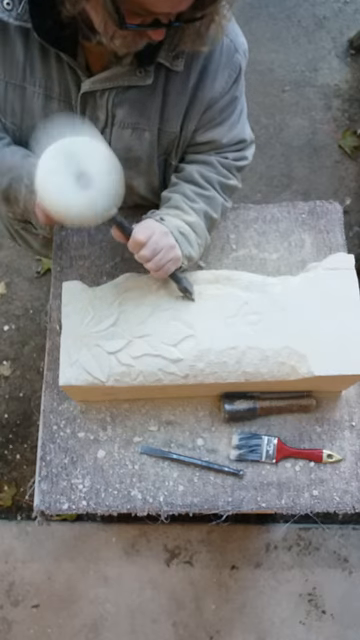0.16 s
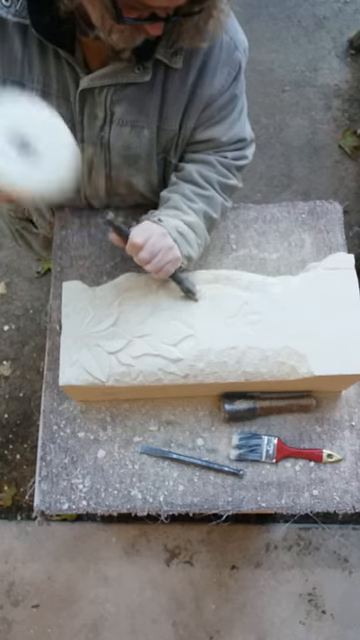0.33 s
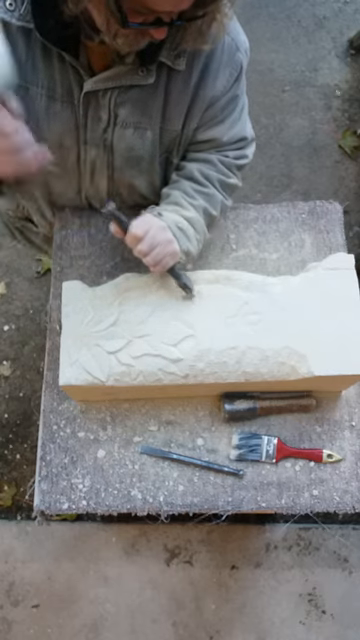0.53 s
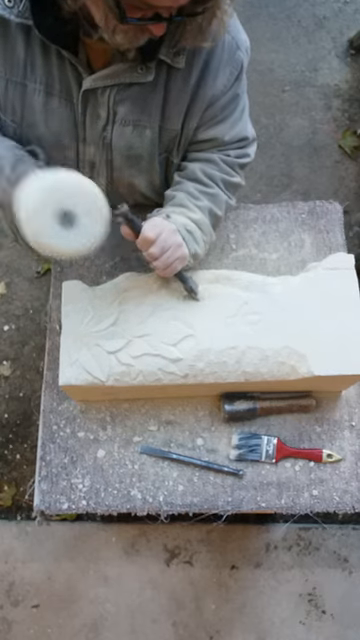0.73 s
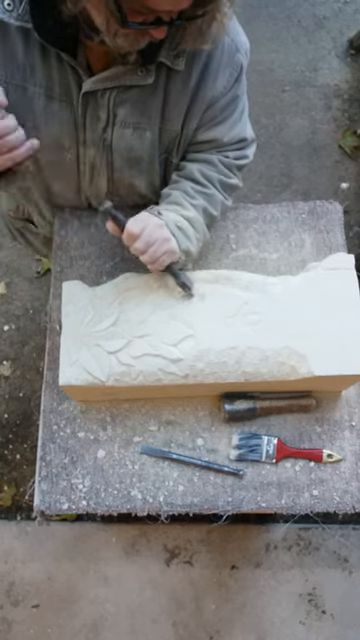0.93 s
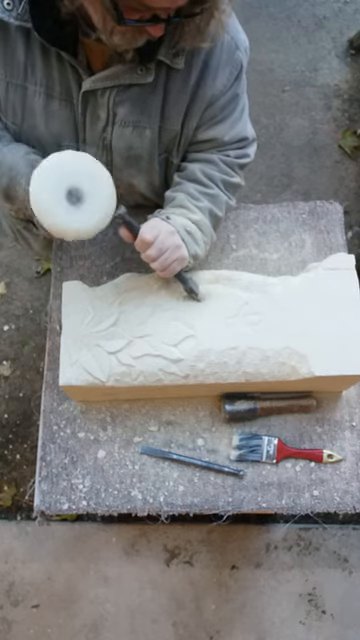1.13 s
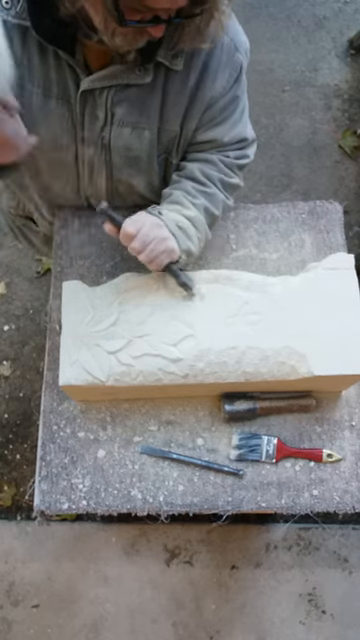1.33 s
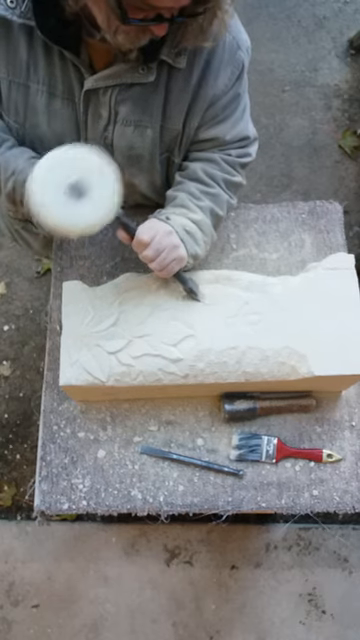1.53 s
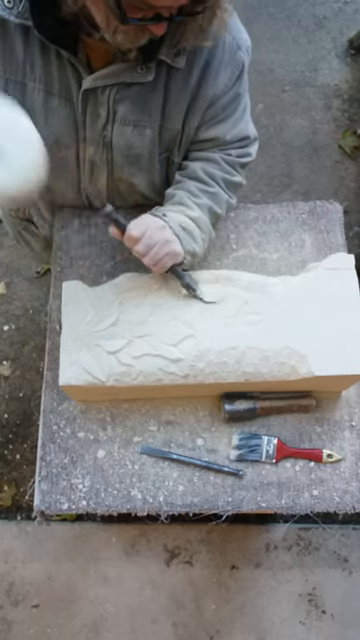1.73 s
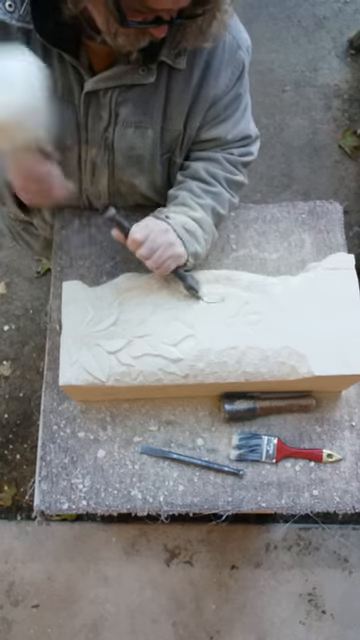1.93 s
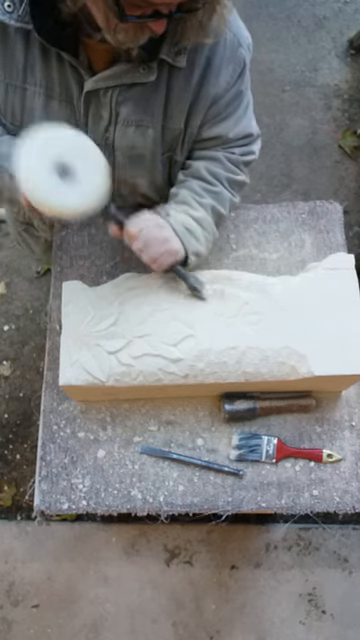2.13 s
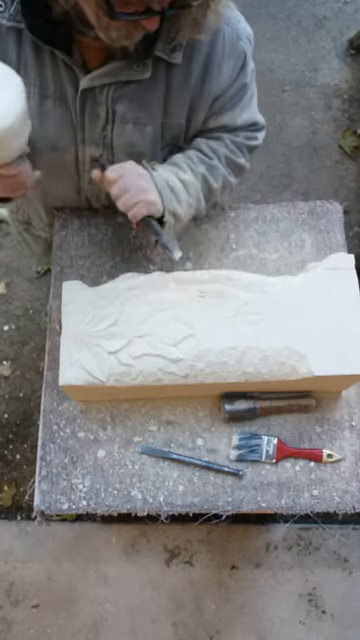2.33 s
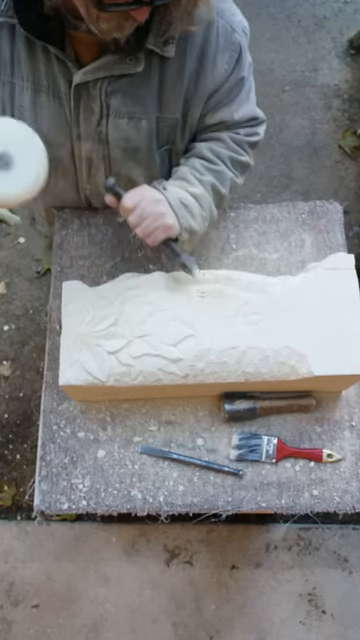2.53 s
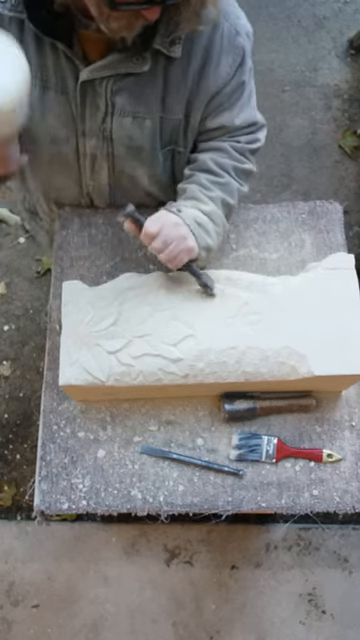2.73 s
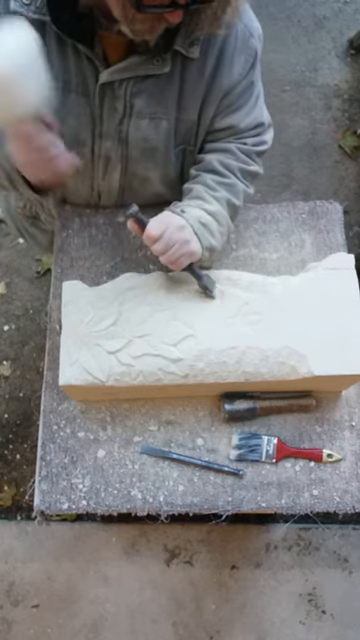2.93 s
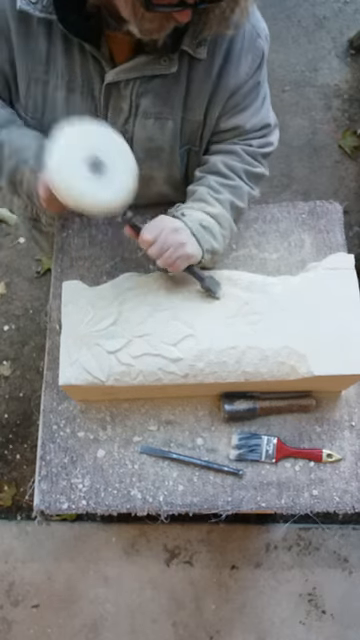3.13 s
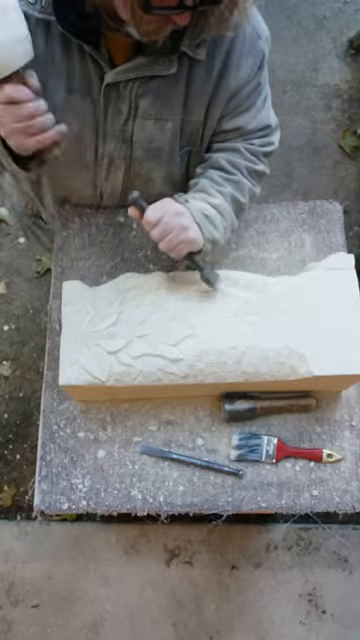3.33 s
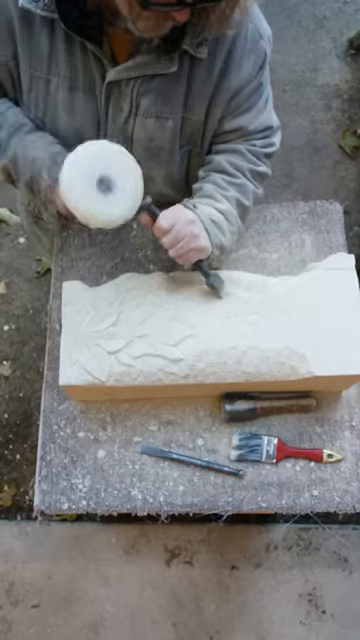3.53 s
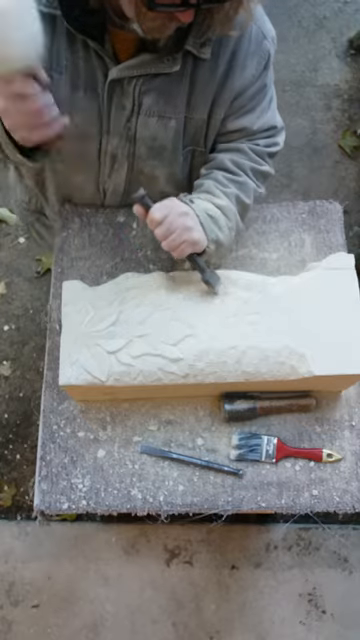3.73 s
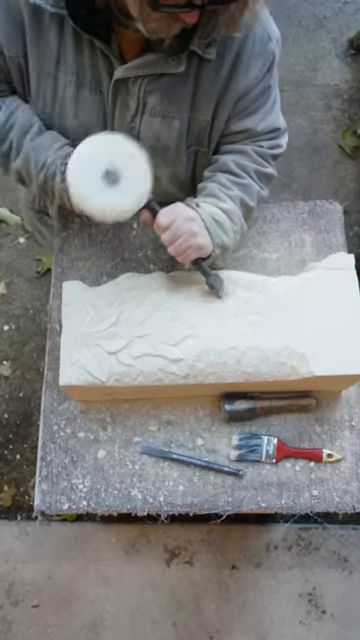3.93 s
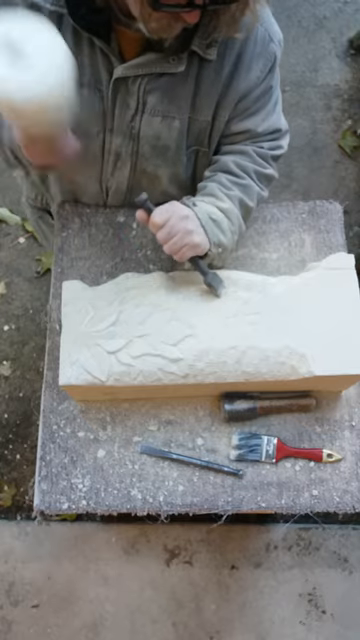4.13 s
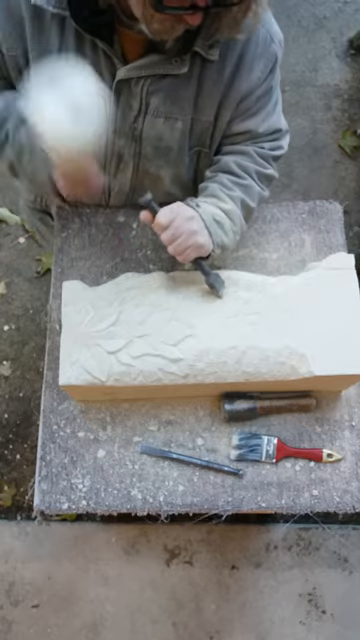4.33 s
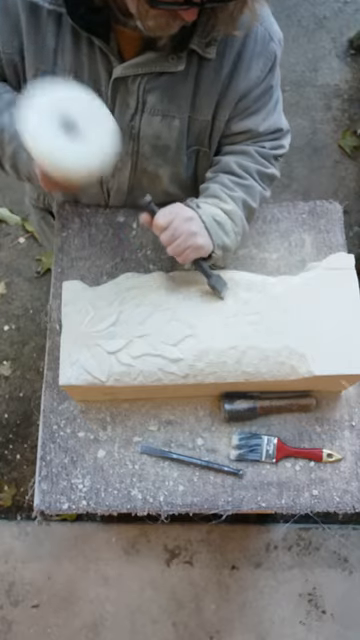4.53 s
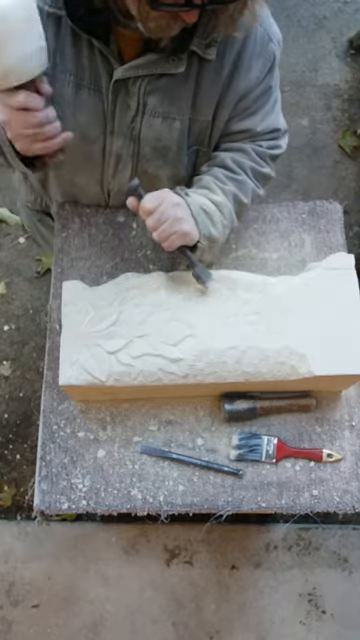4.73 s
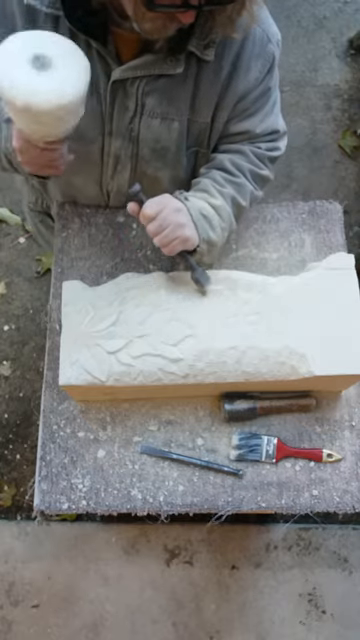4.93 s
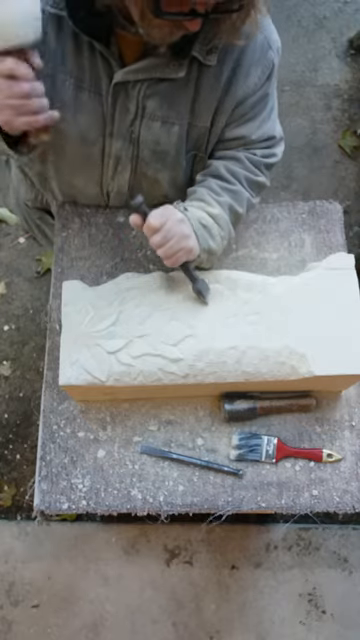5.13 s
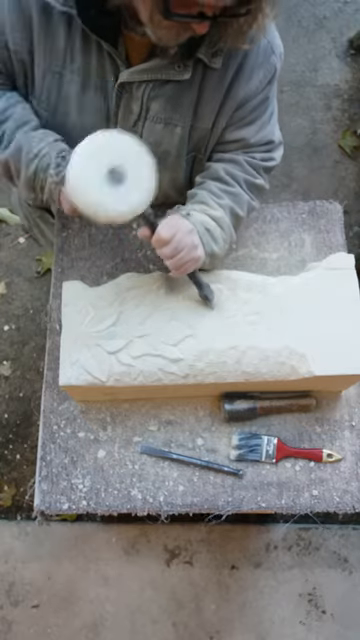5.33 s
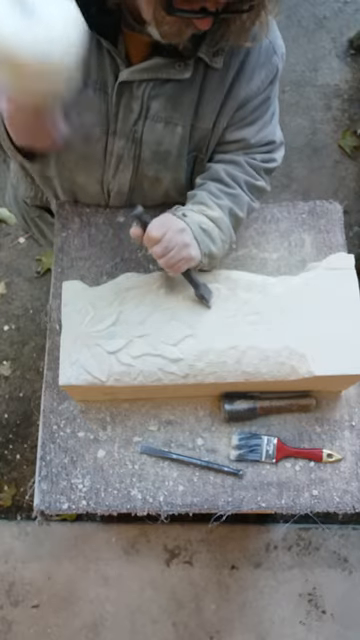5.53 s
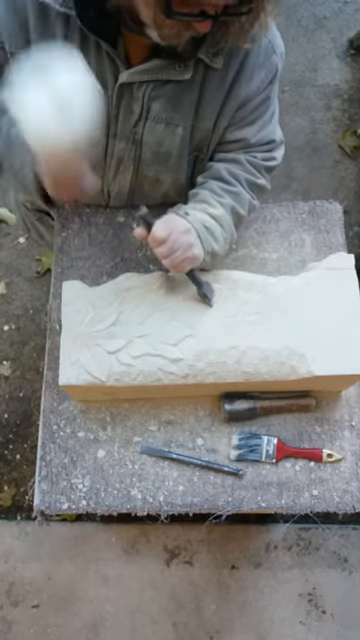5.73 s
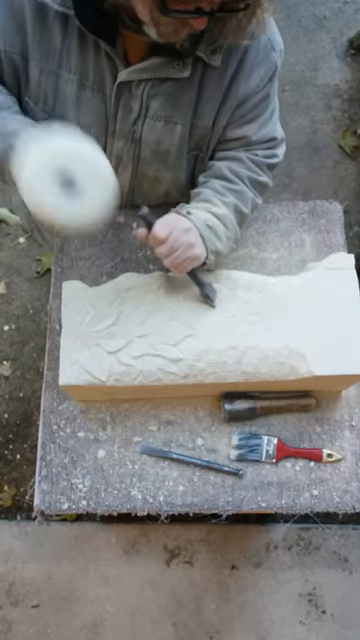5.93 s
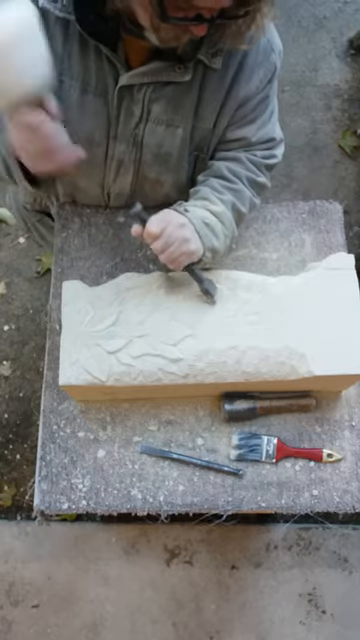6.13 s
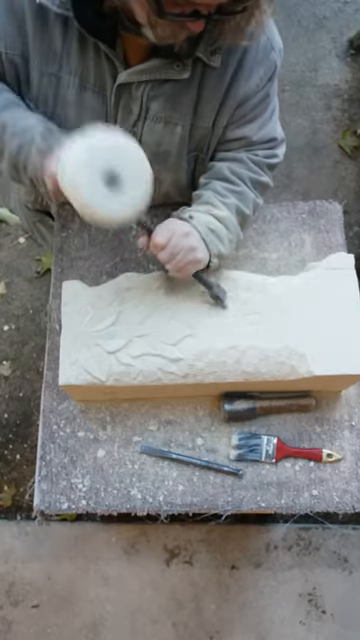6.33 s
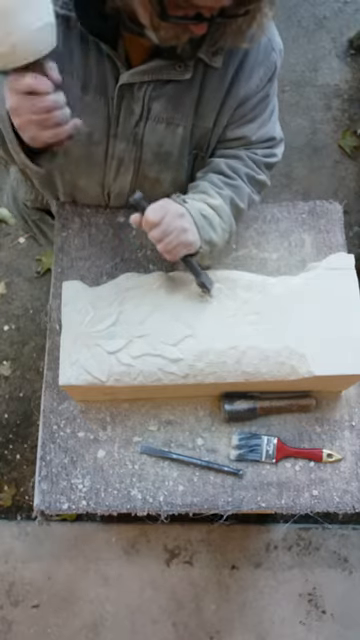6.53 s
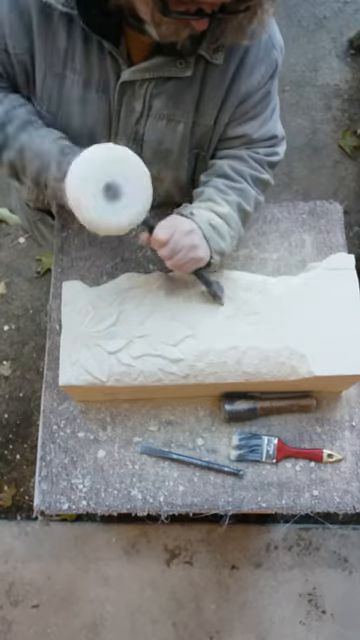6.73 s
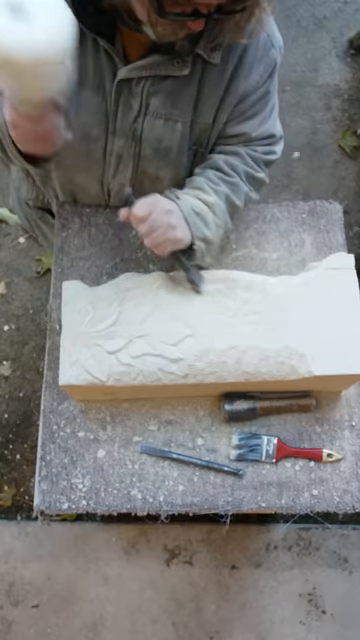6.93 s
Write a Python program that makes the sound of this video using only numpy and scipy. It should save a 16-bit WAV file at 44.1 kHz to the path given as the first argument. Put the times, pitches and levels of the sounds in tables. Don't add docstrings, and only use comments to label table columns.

```python
import sys
import numpy as np
from scipy import signal
from scipy.fft import rfft, irfft, next_fast_len
from scipy.io import wavfile
from scipy.ndimage import uniform_filter1d, minimum_filter1d, map_coordinates

SR = 44100
rng = np.random.default_rng(int(sys.argv[2]) if len(sys.argv) > 2 else 0)


def decibels_to_gain(level_db):
    exponent = np.asarray(level_db, float) / 20
    return 10 ** exponent


def int16_out(signal):
    q = np.round(np.clip(np.atleast_2d(signal).T, -1, 1) * 32767)
    wavfile.write(sys.argv[1], SR, q.astype(np.int16))


N = 307377
TAIL = 2 ** 15


def along(points, hz):
    f, value = np.transpose(points)
    return np.interp(np.log(hz + 1), np.log(f + 1), value)


def wobble(rate, size):
    knots = rng.standard_normal(int(size * rate / SR) + 4)
    return map_coordinates(knots, [np.arange(size) * rate / SR])


def add(out, s, sound):
    at = round(s * SR)
    sound = sound[max(-at, 0):][:N - max(at, 0)]
    out[max(at, 0):][:len(sound)] += sound


def coloured(spectrum, size, tilt_db=0):
    hz = np.fft.rfftfreq(size, 1 / SR)
    z = rfft(rng.standard_normal(size)) * decibels_to_gain(along(spectrum, hz))
    tilt = decibels_to_gain(tilt_db * np.log2((hz + 50) / 4000))
    return irfft(z * tilt, size) / np.std(irfft(z, size))


def resonance(f, centre, width):
    return 1j * f * width / (centre * centre - f * f + 1j * f * width)


def struck(modes, contact_s, low_db):
    size = 2 ** 12
    f = np.fft.rfftfreq(size, 1 / SR)
    push = np.sin(np.pi * np.clip(np.arange(size) / (contact_s * SR), 0, 1))
    body = 0
    for k, (centre, width, db) in enumerate(modes):
        sign_and_lift = -decibels_to_gain(low_db) if k == 0 else 1
        body = body + sign_and_lift * decibels_to_gain(db) * resonance(f, centre, width)
    knock = irfft(rfft(push) * body, size)
    return knock / np.abs(knock).max()


STRIKE_TIMES = [-.17, .2848, .7357, 1.1821, 1.6404, 2.1108, 3.1284, 3.5846, 4.0279, 4.4773, 5.4277, 5.8821,
                6.3324, 6.7845]
# columns strength [level/dB], slab thump [level/dB], bite into the stone [level/dB]
BLOW_FORCES = [(-9, -1, 2), (-11.5, -0.5, 5), (-10.5, 4.5, 1), (-9.5, 3, -0.5), (-12, 1.5, 1.5),
               (-14, -2.5, 10), (-8, 4.5, 7.5), (-7, 3, 7), (-11, 4.5, 5.5), (-9, 0, 10),
               (-10.5, -5.5, 3.5), (-6.5, -0.5, 6.5), (-10.5, -3, 8.5), (-14, -8, 8)]
GRIP_FREE_HZ = [1560, 1570, 1730, 1910, 1920, 4300, 4260, 1380, 3030, 3250, 4050, 1910, 4070, 4060]


def mallet():
    out = np.zeros(N)
    usual_db, yard_follows = -7, 0.9
    for s, free_hz, (db, thump_db, bite_db) in zip(STRIKE_TIMES, GRIP_FREE_HZ, BLOW_FORCES):
        yard_db = -17.5 + yard_follows * (db - usual_db)
        add_knock(out, s, db, thump_db)
        add(out, s, decibels_to_gain(db + bite_db - 9.5) * stone_crack())
        add_ringing(out, s, yard_db, free_hz, thump_db, bite_db)
        dull_db = -1.26 + 0.13 * bite_db
        add(out, s, decibels_to_gain(yard_db) * yard(dull_db))
    return out


# columns f/Hz, width [f/Hz], level/dB
KNOCK_MODES = [(240, 55, 2), (366, 55, 5), (695, 80, -1), (1384, 60, 6), (1904, 60, 6), (3450, 300, -30)]
# columns lag [t/s], level/dB
BOUNCE_PATHS = [
    (0, -.7),
    (.0012, 0),
    (.0024, -1.7),
    (.0036, -16),
]


def add_knock(out, s, db, thump_db):
    t = np.arange(2 ** 12) / SR
    knock = struck(KNOCK_MODES, .00059, thump_db) / (1 + (t / .008) ** 3)
    for lag, bounce_db in BOUNCE_PATHS:
        add(out, s + lag, decibels_to_gain(db + bounce_db + 13) * knock)


# columns f/Hz, level/dB per Hz
CRACK_SPECTRUM = [(1590, -6), (2700, -6.5), (3050, -4.5), (3770, -7.5), (4870, -11), (6070, -38),
                  (7680, -15), (9000, -24.5), (11700, -22.5), (16500, -40)]


def stone_crack():
    t = np.arange(2 ** 12) / SR
    return coloured(CRACK_SPECTRUM, len(t)) * (1 - np.exp(-t / 0.0015)) * decibels_to_gain(-60 * t / 0.05)


MODE_HZ = [140, 1470, 1818, 3188, 4240, 4835, 195, 2980, 5600, 7800, 11400, 3563]
MODE_BLUR_HZ = [60, 35, 28, 40, 200, 340, 60, 300, 600, 1000, 500, 60]
# columns level/dB, t60 [t/s], clean share [ratio], first ping [level/dB]
MODE_RINGS = [(-31, 0.65, 0.068, -17), (-30.5, 0.44, 0.21, -18), (-36.5, 0.54, 1.5, 10),
              (-36.5, 0.33, 1.84, -11), (-35.5, 0.37, 0.56, 12), (-36.5, 0.4, 0.2, -6), (-31, 0.4, .1, -12),
              (-36.5, 0.18, 0.045, 21.5), (-47, 0.21, .05, 5), (-56, 0.29, .05, -12), (-51.5, 0.17, .05, 9),
              (-40.5, 0.17, 1.2, -1)]
MODE_GRIPPED_DB = [-4, -5.5, -5, -14.5, -16.5, -6.5, 1.5, -11, 0, 0., -1, -4.5]


def add_ringing(out, s, yard_db, free_hz, thump_db, bite_db):
    free_db, free_octaves = 23, .06
    for hz, blur_hz, mode, gripped_db in zip(MODE_HZ, MODE_BLUR_HZ, MODE_RINGS, MODE_GRIPPED_DB):
        freed_db = free_db / (1 + (np.log2(hz / free_hz) / free_octaves) ** 2)
        driven_db = 0
        if hz < 300:
            driven_db = thump_db
        elif hz > 5000:
            driven_db = bite_db
        add(out, s, decibels_to_gain(yard_db + gripped_db + freed_db + driven_db + 23) * ring(hz, blur_hz, *mode))


def ring(hz, blur_hz, db, t60, clean, ping_db):
    t = np.arange(TAIL // 2 + TAIL // 4) / SR
    knots = [1, 1j] @ rng.standard_normal(size=(2, 800))
    smear = clean + np.interp(t * blur_hz, np.arange(len(knots)), knots)
    tail = smear * decibels_to_gain(-60 * t / t60) * (1 - np.exp(-t / 0.0023))
    ping = decibels_to_gain(ping_db - 60 * t / .022) * (1 - np.exp(-t / .001))
    return decibels_to_gain(db) * np.imag((ping + tail) * np.exp(2j * np.pi * hz * t))


# columns f/Hz, level/dB per Hz
YARD_SPECTRUM = [(35, -72), (60, -17), (113, -7), (311, -9), (366, -9.5), (691, -2), (1060, -3.5),
                 (1210, -1.5), (1470, -6.5), (4220, -24), (6600, -38), (7780, -41), (15400, -40.5),
                 (16500, -42)]
# columns f/Hz, width [f/Hz], level/dB
YARD_NOOKS = [(544, 92, -2), (649, 110, 3), (810, 75, 1.5), (906.7, 30, 6.5), (1051, 84, 5.5),
              (1124, 7, -9.5), (1485, 150, 5.5), (1595, 27, -22), (1940, 90, 6), (2344, 220, 3)]
# columns f/Hz, t60 [t/s]
YARD_DECAY = [(80, 1), (210, 0.52), (560, 0.53), (1470, 0.38), (3880, 0.45), (10200, 0.33)]
# level/dB, t60 factor [ratio]
SLOW_TAIL = (-21.5, 2.35)


def yard(tilt_db):
    t, f = np.arange(TAIL) / SR, np.fft.rfftfreq(TAIL, 1 / SR)
    nooks_db = sum(db / (1 + (2 * (f - c) / w) ** 2) for c, w, db in YARD_NOOKS)
    rush = irfft(rfft(coloured(YARD_SPECTRUM, TAIL)) * decibels_to_gain(nooks_db), TAIL)
    hz, frames, z = signal.stft(rush, SR, nperseg=512)
    decay_db = -60 * frames / along(YARD_DECAY, hz)[:, None]
    slow_db, slower = SLOW_TAIL
    fade = decibels_to_gain(decay_db) + decibels_to_gain(slow_db + decay_db / slower)
    tilt = decibels_to_gain(tilt_db * np.log2((hz[:, None] + 50) / 1000))
    tail = signal.istft(z * tilt * fade, SR, nperseg=512)[1][:TAIL]
    return tail * (1 - np.exp(-(t / .008) ** 2))


# columns t/s, peak [level/dB], thud [level/dB], yard [level/dB]
CHISEL_SEATS = [(0.07, -50, -2, -14), (0.23, -31, 23, -39), (0.666, -30, 27, -23), (1.114, -30, 24, -25),
                (1.562, -27, 16, -32), (2.609, -39, -7, -17), (2.631, -28, -19, -11),
                (2.648, -28.5, -11, -28), (3.505, -24.5, 14.5, -22.5), (3.961, -38, 7, -44),
                (3.975, -37, 20, -32), (5.227, -30.5, -5, -18.5), (5.265, -33, 13, -24),
                (5.836, -25.5, 14.5, -26), (6.276, -25.5, 17, -30), (6.735, -76, 10, -20)]
# columns f/Hz, width [f/Hz], level/dB
SEAT_MODES = [(205, 20, -2), (690, 185, -4.5), (1450, 90, -8), (4100, 210, -23), (7560, 170, -19)]


def chisel():
    out = np.zeros(N)
    for s, db, thud_db, yard_db in CHISEL_SEATS:
        knock = struck(SEAT_MODES, .00016, thud_db)
        add(out, s, decibels_to_gain(db - 4.5) * knock)
        add(out, s + 0.0024, decibels_to_gain(db - 0.5) * knock)
        add(out, s, decibels_to_gain(db + yard_db) * yard(0))
    return out


# columns f/Hz, level/dB per Hz
GRIT_SPECTRUM = [(500, -32), (1500, 7), (3500, 8.5), (6300, -11), (7800, -14), (10000, -23), (15500, -19),
                 (16500, -21)]


def grit(events, fall_s):
    out, t = np.zeros(N), np.arange(2 ** 13) / SR
    shape = (1 - np.exp(-t / 0.0024)) * decibels_to_gain(-30 * t / fall_s)
    for s, db, tilt_db in events:
        grains = decibels_to_gain(2.2 * wobble(600, len(t)))
        add(out, s, decibels_to_gain(db - 12) * coloured(GRIT_SPECTRUM, len(t), tilt_db) * grains * shape)
    return out


# columns t/s, peak [level/dB], brightness [level/dB per octave]
CHIP_FALLS = [(0.028, -34, 7), (0.115, -32, 2), (0.1491, -34.5, 6), (0.2264, -33, 9.5), (0.43, -50, 4),
              (0.476, -37, 9.5), (0.5397, -39, 4), (0.571, -33, 9.5), (0.7, -38, 11), (0.902, -38, 8),
              (1.13, -43, 14.5), (1.45, -33, 8), (1.5179, -44, 10), (2.227, -28, 7), (2.646, -29, -4),
              (2.7472, -35, 2.), (2.7994, -31.5, -2), (2.896, -35, 4), (3.7375, -27, 12), (3.8194, -38, 4),
              (3.902, -41, 12), (4.2194, -38, -10), (5.126, -46, -3), (5.208, -41.5, 23), (5.351, -38, 10),
              (6.62, -37, 7), (6.6353, -31, 5), (6.654, -37, 7), (6.731, -38.5, 5)]


def chips():
    return grit(CHIP_FALLS, 0.026)


# columns t/s, peak [level/dB], brightness [level/dB per octave]
TIP_DRAGS = [
    (1.5569, -41.5, 4),
    (1.981, -42, 6.5),
    (2.768, -31, 6),
    (5.157, -38.5, -5),
    (5.225, -28.5, 10.5),
]


def drags():
    return grit(TIP_DRAGS, 0.095)


# columns f/Hz, level/dB per Hz
TOWN_SPECTRUM = [(15, -51), (25, -29), (43, 0.5), (208, -4), (368, -5), (410, -5.5), (483, -8.5),
                 (617, -7.5), (1780, -19.5), (3510, -22), (5720, -39), (13000, -43.5), (16500, -37)]


def town():
    t = np.arange(N) / SR
    hush_db, recover_s = 6, 0.64
    since = t - np.take(STRIKE_TIMES, np.searchsorted(STRIKE_TIMES, t) - 1)
    level_db = -47.5 - hush_db * np.exp(-since / recover_s)
    patches = decibels_to_gain(0.34 * wobble(2.9, N) + 1.5 * wobble(3.7, N))
    return decibels_to_gain(level_db) * coloured(TOWN_SPECTRUM, N) * patches


# columns t/s, level/dB
BREEZE_LEVEL = [(0, -50), (1.2, -53), (2, -49), (2.5, -65), (3.3, -51), (4.7, -68), (5.4, -58), (6.6, -52),
                (6.97, -36)]
# columns t/s, level/dB
WIND_GUSTS = [
    (1.645, -49),
    (3.59, -51),
    (5.31, -39),
    (5.66, -33),
    (6.62, -41),
]


def breeze():
    t = np.arange(N) / SR
    level_db = np.interp(t, *np.transpose(BREEZE_LEVEL))
    for at, db in WIND_GUSTS:
        level_db = np.maximum(level_db, db - 250 * np.abs(t - at))
    rumble = coloured([(15, -24), (35, -17), (65, 19), (110, -2), (200, -40), (400, -120)], N)
    return decibels_to_gain(level_db - 2.5 + 2.6 * wobble(1.5, N)) * rumble


def scene():
    return (mallet() + chisel() + chips() + drags() + town() + breeze())[None]


# f/Hz, width [f/Hz], lift [level/dB]
MIC_PORT = (7800, 800, 5)


def microphone(x):
    size = next_fast_len(N + SR)
    f = np.fft.rfftfreq(size, 1 / SR)
    centre, width, lift_db = MIC_PORT
    bass_cut = (1j * f / (1j * f + 70)) ** 3
    peak = 1 + (decibels_to_gain(lift_db) - 1) * resonance(f, centre, width)
    top_cut = decibels_to_gain(np.interp(f, [15800, 16000], [0, -26]))
    return irfft(rfft(x, size) * bass_cut * peak * top_cut, size)[:, :N]


def band_limit(x):
    return signal.sosfilt(signal.butter(12, 16820, fs=SR, output="sos"), x)


def record(dry):
    heard = microphone(dry)
    over_db = np.maximum(20 * np.log10(np.abs(heard[0]) / .92 + 1e-9), 0)
    ramp = np.arange(N) / SR * 140
    held_db = np.maximum.accumulate(over_db + ramp) - ramp
    ahead, glide = int(.017 * SR) | 1, int(.011 * SR) | 1
    early_db = -minimum_filter1d(-held_db, ahead, origin=-(ahead // 2))
    duck_db = uniform_filter1d(early_db, glide, origin=glide // 2)
    return band_limit(heard * decibels_to_gain(-duck_db))


dry = scene()
out = record(dry)
int16_out(out)
```